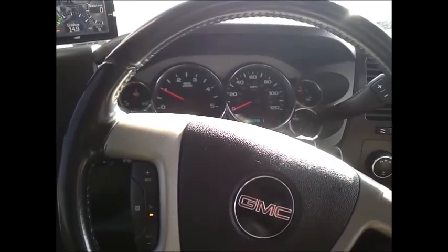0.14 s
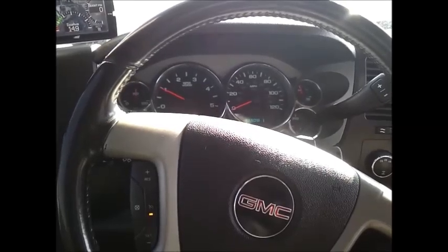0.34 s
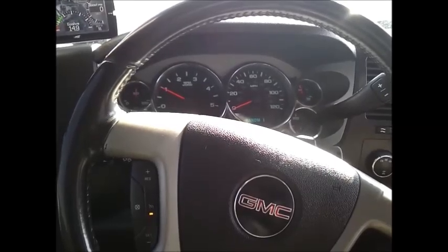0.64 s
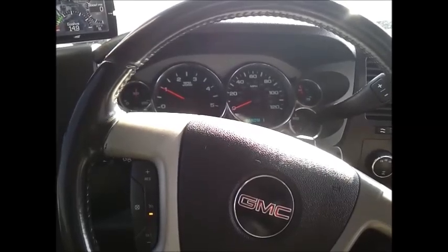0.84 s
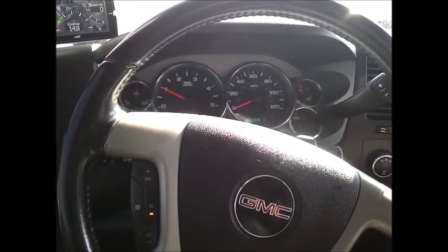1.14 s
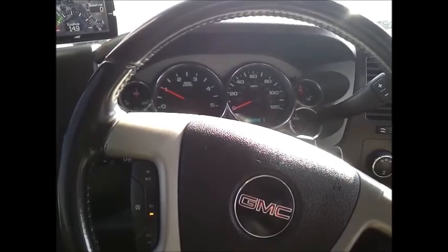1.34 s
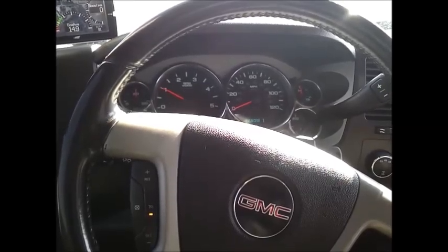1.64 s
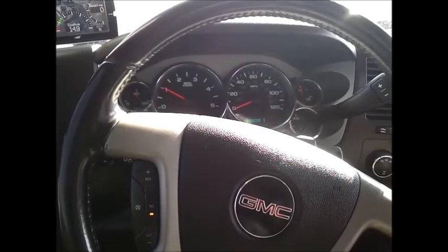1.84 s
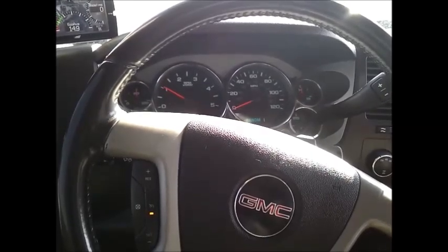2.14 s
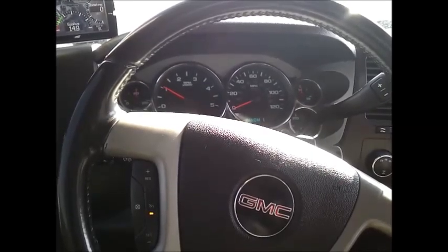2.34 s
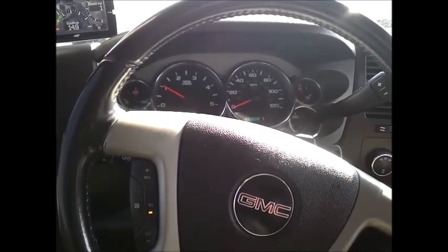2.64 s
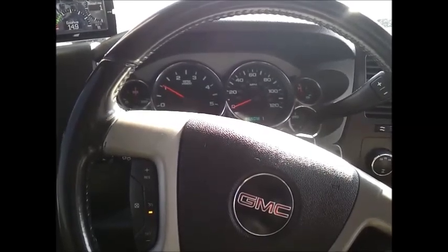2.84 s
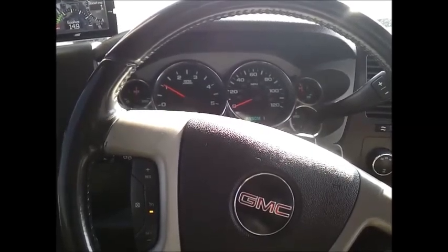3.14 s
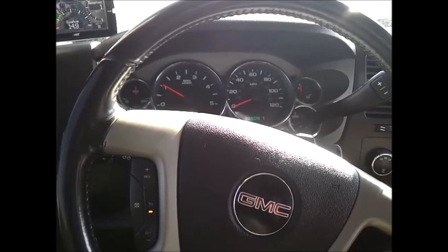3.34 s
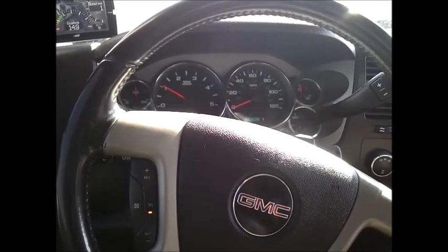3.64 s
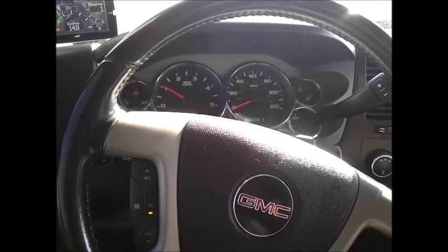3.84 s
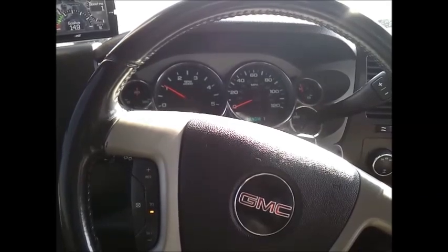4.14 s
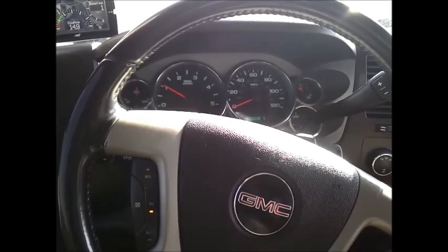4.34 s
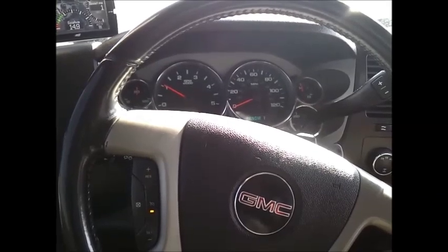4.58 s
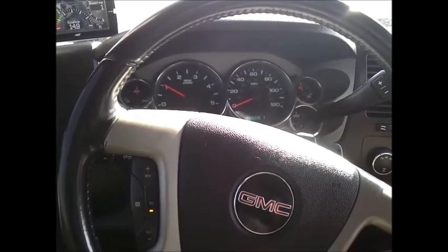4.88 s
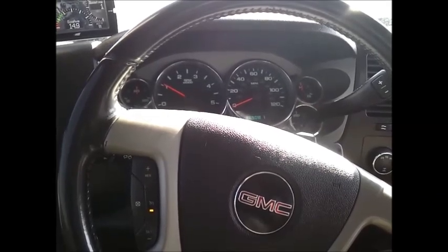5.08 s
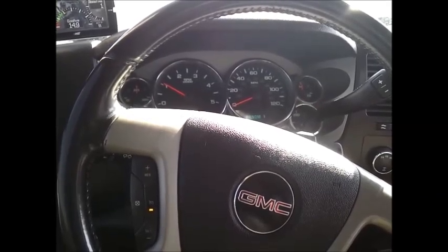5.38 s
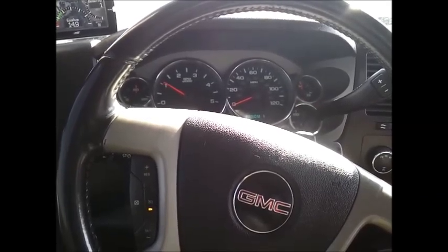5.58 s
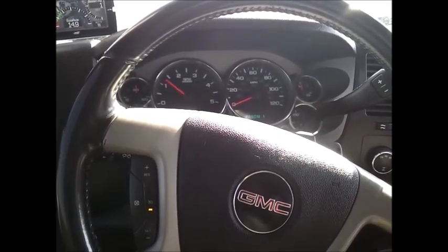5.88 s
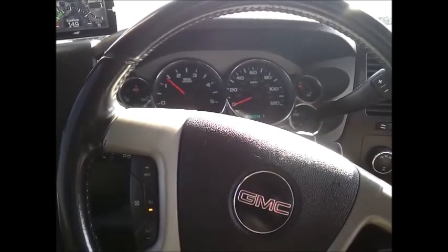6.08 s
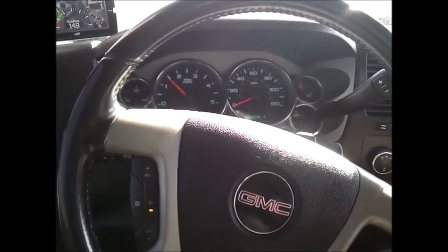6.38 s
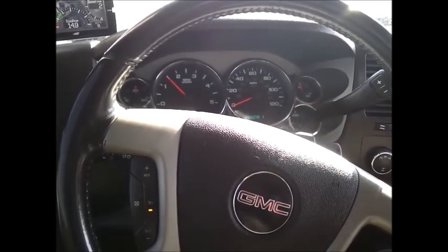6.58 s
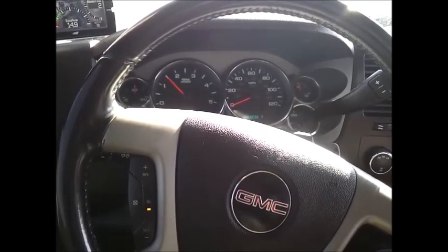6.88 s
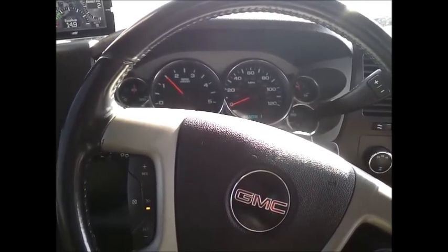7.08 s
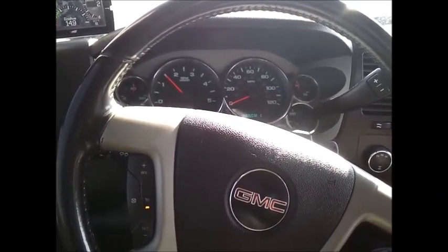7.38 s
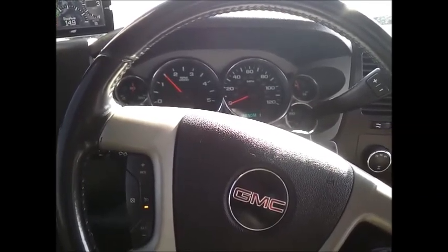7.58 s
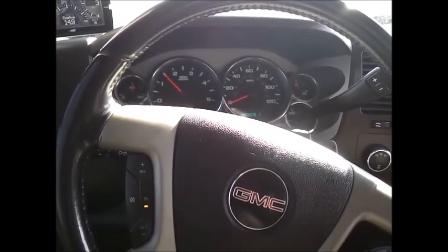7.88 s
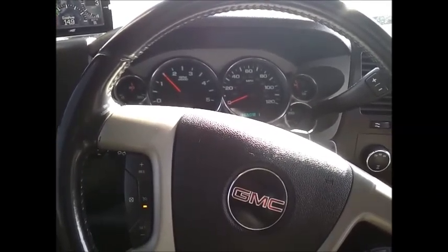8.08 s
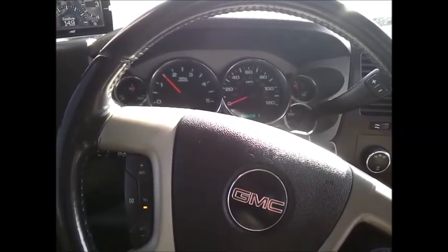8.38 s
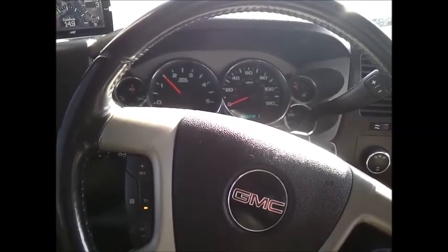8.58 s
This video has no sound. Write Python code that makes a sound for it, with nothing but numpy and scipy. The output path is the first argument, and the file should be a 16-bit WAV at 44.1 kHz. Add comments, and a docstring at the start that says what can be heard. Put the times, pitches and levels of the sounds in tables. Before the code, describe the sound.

A turbo diesel truck stands running, heard inside the cab from the driver's seat in mono with a muffled top end. From 0 s a low, smooth engine boom around 67 hertz sits under rough pulsed rumble, with a thin turbo whistle near 1.7 kilohertz and soft air rush. Around 1.3-1.5 s the revs rise slightly to 72 hertz and the boom recedes; uneven bass surges and a faint resonant drone remain. The whistle glides steadily upward, reaching about 2.2 kilohertz near 4.5 s, joined by wavering higher overtones and a beating second whistle. At 5.2-6.1 s the engine revs up to about 100 hertz, booming and growling more strongly. The whistle pitch then holds nearly level while airy rush, hiss, breathy howl and brief chirps swell, strongest from 7.4 s until the cut at about 8.7 s.

```python
"""Cab of a turbo diesel truck standing at fast idle, heard from the driver's seat; the revs step up twice.
Engine: firing-rate sines boom and rock; pulsed noise rumbles and growls, its bass surging irregularly.
Turbocharger: spools up slowly, whistling at multiples of shaft speed over swelling rush, howl and eddies.
Fixed resonances of ducts and cab colour engine, air, howl, eddies and the lowest whistle notes."""
import sys
import numpy as np
from scipy import signal
from scipy.fft import rfft, irfft, next_fast_len
from scipy.io import wavfile
from scipy.ndimage import uniform_filter1d

SR = 44100
rng = np.random.default_rng(int(sys.argv[2]) if len(sys.argv) > 2 else 0)


def persist_wave(psi):
    """Save psi, clipped to +-1, as 16-bit WAV."""
    counts = np.round(np.clip(psi, -1, 1) * 32767).astype(np.int16)
    wavfile.write(sys.argv[1], SR, np.atleast_2d(counts).T)


N = 384552
HZ = np.maximum(np.fft.rfftfreq(N, 1 / SR), 1)
CUTOFF_HZ = 7600
REF_FLOW_DB = -30

# Engine speed and boom: [t/s, firing rate/Hz, boom level before cab/dB]
ENGINE = [(0, 66.8, -28.5), (1.15, 67.5, -27.5), (1.35, 69, -31), (1.55, 72, -41.5), (5.2, 72.4, -47),
          (5.35, 77.5, -32), (5.55, 88, -37), (5.85, 91.8, -33.5), (6.0, 96, -29.5), (6.14, 100, -28.5),
          (6.8, 100.3, -28.5), (7.2, 98.3, -30), (8.72, 100.1, -28)]
# Combustion noise spectrum at top revs, before bass surges and cab: [f/Hz, level per Hz/dB]
RUMBLE = [(25, -63), (55, -65), (80, -59), (100, -63.5), (125, -49.5), (168, -50), (220, -61.5),
          (330, -66.5), (450, -60.5), (600, -65.5), (750, -78), (1300, -72), (2200, -87.5), (7000, -122.5)]
# Engine orders exciting panels, before bass surges and cab:
# [multiple of firing rate, panel f/Hz, full width at half gain/Hz, mean level at resonance/dB]
PANELS = [(3, 305, 24, -47), (2, 158, 35, -35)]
# Irregular surges of the low rumble: [t/s, bass level change/dB]
BASS_SURGES = [(0.288, -1), (0.981, 7), (1.672, 8.5), (1.705, 9.5), (1.828, 5), (1.879, 7.5), (1.961, 6.5),
               (2.039, 4.5), (2.245, 3), (2.409, 8), (2.498, 4), (2.559, 4), (2.687, 9), (2.795, 9.5),
               (2.972, 4.5), (3.017, 6), (3.064, 3), (3.154, 6.5), (3.195, 7), (3.359, 5), (3.472, 4.5),
               (3.68, 10), (3.889, 4.5), (3.947, 6.5), (4.082, 5), (4.623, 5), (4.714, 5.5), (5.201, 5),
               (5.389, 7), (5.546, 9), (5.772, 5), (5.957, 8), (6.007, 4.5), (6.34, 6.5), (6.679, 0.5),
               (6.829, 6), (7.015, 5.5), (7.17, 5), (7.848, 10.5), (8.453, 2.5)]
# Engine orders ringing out, before bass surges and cab:
# [peak t/s, length/s, multiple of firing rate, level/dB]
PULL = [(4.1, 0.22, 2, -37), (5.5, 0.24, 3, -39), (6.02, 0.38, 6, -39.5)]
# Ducts and cab, resonances and dips: [f/Hz, full width at half the dB/Hz, level/dB]
CAB = [(766, 56, -4), (872, 265, 8), (1121, 47, -8), (1278, 16, 6), (1573, 14, 4.5), (1672, 55, 5),
       (1920, 125, 9), (2150, 35, -11), (2315, 140, 3), (2480, 50, 8), (2441, 54, -9.5), (2846, 120, 6.5),
       (3424, 240, 6), (3990, 34, 4), (4563, 79, 6), (4885, 121, 5), (5080, 190, -5), (5705, 140, 7),
       (5770, 90, -7), (6155, 240, 5.5), (6270, 78, -7), (6810, 102, 3)]
# Turbocharger shaft: [t/s, turns per s/Hz]
SPOOL = [(0, 1668), (0.5, 1708), (1.2, 1778), (1.8, 1849), (3, 2021), (3.9, 2144), (4.5, 2223), (4.8, 2245),
         (5.4, 2259), (6, 2253), (7.2, 2230), (7.8, 2224)]
# Turbocharger air flow, driving rush, hiss, gush, eddies and whistles: [t/s, level/dB]
FLOW = [(0.0, -43.5), (0.05, -43.5), (1.58, -42), (2.13, -40), (3.35, -39.5), (3.69, -38), (5.36, -36),
        (6.58, -31.5), (7.07, -33), (7.75, -29.5), (8.35, -30), (8.72, -26.5)]
# Air rush colour, before level and flow: [f/Hz, relative level per Hz/dB]
RUSH = [(100, -80), (300, -69), (800, -68), (1400, -61), (2000, -59.5), (2600, -62.5), (3500, -64.5),
        (4200, -67), (5600, -66), (6800, -68.5), (7400, -76), (7800, -113)]
# Rough flow at the wheel: [peak t/s, length/s, howl lift/dB, gush lift/dB]
FLOW_SURGES = [(3.293, 0.27, 2.5, 9), (3.55, 0.19, 6, 4.5), (3.822, 0.49, 4.5, 11), (5.8, 0.9, 6, 5.5),
               (6.25, 0.15, 3, 2), (7.447, 1.0, 9.5, 4.5), (8.411, .25, 6, 9)]
# Wheel eddies, before cab:
# [multiple of shaft rate, half-width at -6 dB/Hz, level at reference flow/dB, gain per flow dB/dB]
WHIRL = [(.52, 70, -47, 0.6), (.755, 35.3, -44, 1), (.86, 70, -44, 1), (1.42, 170, -41.5, 1.06),
         (2.52, 111.7, -47, 2.1)]
# Whistle at 1, 2, 3 times shaft rate; the first before cab:
# [mean level at reference flow/dB, gain per flow dB/dB, skirt level relative to tone/dB]
WHISTLE = [(-37, 1.42, -19), (-45.5, 2, -10), (-50, 0.6, -18.5)]
# Swells and dips of single whistle notes: [peak t/s, length/s, multiple of shaft rate, lift/dB]
SWELLS = [(0.2, 0.13, 1, 8), (.7, .4, 1, -5), (2.65, 0.28, 1, 3), (4.25, 0.38, 1, -12), (4.85, .5, 1, 2),
          (5.78, 0.33, 1, 5.5), (7.0, .14, 1, -3), (7.25, 0.26, 1, 2.5), (7.65, 0.5, 1, 7.5),
          (8.22, 0.11, 1, 7), (8.6, 0.41, 1, 3), (3.899, 0.31, 2, 9), (4.93, 0.33, 2, 11), (5.6, .22, 2, 4),
          (6.5, 0.69, 2, 13), (6.05, .22, 2, 6.5), (7.6, 0.33, 2, 4), (7.83, 0.063, 2, -10),
          (8.22, 0.38, 2, 8), (8.58, 0.25, 2, 3.5), (0.5, 0.72, 3, -8.5), (1.4, 0.33, 3, 1.5),
          (1.71, 0.13, 3, 12), (1.87, 0.21, 3, 10), (2.5, .45, 3, 3.5), (7.56, 0.35, 3, 10.5),
          (7.84, 0.4, 3, 16), (8.4, .35, 3, 8.5)]
# Second, fainter whistle beside the shaft rate: [t/s, f/Hz]
SIDE_WHISTLE = [(0, 1617), (.6, 1668), (1.5, 1763), (2.15, 1842), (3.1, 1973), (3.7, 2065), (4.55, 2178),
                (5.15, 2243), (6.6, 2219), (7.1, 2263), (8.72, 2261)]
# Side tones of the shaft: [peak t/s, length/s, multiple of shaft rate, mean level/dB]
FLARES = [(0.24, .25, 3.385, -57), (1.2, .25, 3.41, -59), (2.55, .35, 3.53, -61), (3.23, .16, 3.435, -57),
          (3.2, .35, .76, -48), (5.15, .8, .527, -52.5)]
# Howl breaking into chirps: [peak t/s, mean f/Hz, level/dB]
CHIRPS = [(3.523, 1658, -35), (4.41, 1670, -33.5), (5.346, 1680, -30), (6.804, 1696, -30),
          (7.276, 1680, -27.5), (8.425, 1676, -33)]


def from_db(db):
    """Decibels to amplitude gain."""
    return 10 ** (np.asarray(db) / 20)


def in_time(rows):
    """Table columns interpolated to every sample."""
    t_s, *columns = np.transpose(rows)
    return [np.interp(np.arange(N) / SR, t_s, column) for column in columns]


def colour(points):
    """Gain over HZ, interpolated in dB over log frequency."""
    hz, db = np.transpose(points)
    return from_db(np.interp(np.log(HZ), np.log(hz), db))


def noise(gain):
    """Gaussian noise with the given rms gain per Hz."""
    return irfft(rfft(rng.standard_normal(N)) * gain * np.sqrt(SR / 2), N)


def drift(corner_hz, step=8):
    """Low-passed noise of spread 1, -6 dB at the corner, drawn every eighth sample."""
    size = next_fast_len(N // step + 2)
    hz = np.fft.rfftfreq(size, step / SR)
    spectrum = rfft(rng.standard_normal(size)) / (1 + (hz / corner_hz) ** 2)
    slow = irfft(spectrum, size)
    return np.interp(np.arange(N) / step, np.arange(size), slow / slow.std())


def angle(hz):
    """Phase in radians of a rotation at the given rate, from a random start."""
    return 2 * np.pi * (np.cumsum(hz) / SR + rng.random())


def tone(phase, rms_db):
    """Sine of the given rms level."""
    return np.sqrt(2) * from_db(rms_db) * np.sin(phase)


def breathy(phase, half_width_hz):
    """Noise band of rms 1 around a moving pitch: two random quadrature carriers."""
    return drift(half_width_hz) * np.cos(phase) + drift(half_width_hz) * np.sin(phase)


def swell(peak_s, length_s):
    """Gaussian rise and fall of height 1; length is the full width at half height."""
    out = np.zeros(N)
    start = max(0, int((peak_s - 2 * length_s) * SR))
    stop = min(N, int((peak_s + 2 * length_s) * SR))
    near = np.arange(start, stop)
    out[near] = np.exp2(-(2 * (near / SR - peak_s) / length_s) ** 2)
    return out


def resonance(hz, centre_hz, width_hz):
    """Peak of height 1; width is the full width at half height."""
    return 1 / (1 + (2 * (hz - centre_hz) / width_hz) ** 2)


def cab(x):
    """Ducts and cab lift some pitches and swallow others."""
    db = sum(height_db * resonance(HZ, hz, width_hz) for hz, width_hz, height_db in CAB)
    return irfft(rfft(x) * from_db(db), N)


def engine(firing_hz, boom_db, knock=0.091, half_order_db=-25, rock_db=-42, rock_slowing_db=-20,
           rumble_slowing_db=3.0):
    """Four firings per crank turn: low orders boom and rock, each firing slightly swells the noise."""
    revs = firing_hz / firing_hz.max()
    firing = angle(firing_hz)
    crank = firing / 4
    boom = tone(firing, boom_db)
    rock = tone(crank, rock_db + rock_slowing_db * (1 - revs))
    half_order = tone(crank * 3 / 2, boom_db + half_order_db)
    pulsed = (noise(colour(RUMBLE)) + growl(revs)) * (1 + knock * np.cos(firing))
    rumble = pulsed * from_db(rumble_slowing_db * (1 - revs))
    return boom + rock + half_order + surging_bass(panel_tones(firing_hz, firing) + pull(firing) + rumble)


def growl(revs, full_db=-42.5, full_hz=173, half_width_hz=55, steepness=3.6, peak_s=6.6, length_s=2.6,
          lift_db=9.0, upper_hz=330, upper_db=-10):
    """Two noise bands follow the revs in pitch, rise steeply with them and swell after the second step."""
    lower = breathy(angle(full_hz * revs), half_width_hz)
    upper = from_db(upper_db) * breathy(angle(upper_hz * revs), half_width_hz)
    return from_db(full_db + lift_db * swell(peak_s, length_s)) * revs ** steepness * (lower + upper)


def panel_tones(firing_hz, firing, waver_db=0.82):
    """An engine order is loud only while near the resonance of its panel."""
    return sum(tone(round(k) * firing, db + waver_db * drift(8.5)) * resonance(k * firing_hz, hz, width_hz)
               for k, hz, width_hz, db in PANELS)


def drone(idling, panel_hz=450, half_width_hz=12, idle_db=-48, peak_s=3.2, length_s=1.1, lift_db=8):
    """Narrow resonance shaken by the idling engine: swells once, weakens at higher revs."""
    level = from_db(idle_db + lift_db * swell(peak_s, length_s))
    return idling * level * breathy(angle(np.full(N, panel_hz)), half_width_hz)


def hum(idling, start_hz=235, creep_hz_per_s=12, top_hz=274, idle_db=-49, peak_s=1.85, length_s=1.2,
        lift_db=9.5):
    """Faint sine creeps up to a fixed top, swells once, weakens at higher revs."""
    hz = np.minimum(start_hz + creep_hz_per_s * np.arange(N) / SR, top_hz)
    return idling * tone(angle(hz), idle_db + lift_db * swell(peak_s, length_s))


def air(flow_db, rush_db=-3.5, rush_follows=1.0, hiss_db=-2.0, hiss_follows=1.026, split_hz=4000,
        flutter_db=0.5):
    """Air rushes through the ducts with hiss on top; both grow with flow."""
    high = 1 / (1 + (split_hz / HZ) ** 8)  # power share of the hiss
    rush = noise(colour(RUSH) * np.sqrt(1 - high)) * from_db(rush_db + rush_follows * flow_db)
    hiss = noise(colour(RUSH) * np.sqrt(high)) * from_db(hiss_db + hiss_follows * flow_db)
    return (rush + hiss) * from_db(flutter_db * drift(10))


def howl(shaft, shaft_hz, flow_db, swirl_ratio=.745, half_width_hz=70, howl_db=-43, howl_power=8.0,
         gush_db=-41, gush_follows=0.95, gush_half_width_hz=260, churn_db=1.5):
    """Swirl lags the wheel and howls, steeply with its speed; turbulence gushes around the shaft rate."""
    howl_lift_db = sum(db * swell(s, length_s) for s, length_s, db, _ in FLOW_SURGES)
    gush_lift_db = sum(db * swell(s, length_s) for s, length_s, _, db in FLOW_SURGES)
    swirl_level = from_db(howl_db + howl_lift_db) * (shaft_hz / shaft_hz.max()) ** howl_power
    swirl = swirl_level * breathy(swirl_ratio * shaft, half_width_hz)
    gush_level = from_db(gush_db + gush_follows * flow_db + gush_lift_db)
    gush = gush_level * breathy(shaft, gush_half_width_hz)
    return (swirl + gush) * from_db(churn_db * drift(30))


def whirl(shaft, flow_db):
    """Eddies lock to fixed ratios of shaft speed: breathy strands moving with it."""
    return sum(from_db(db + follows * flow_db) * breathy(k * shaft, half_width_hz)
               for k, half_width_hz, db, follows in WHIRL)


def whistle(shaft, flow_db, waver_db=2.0, breath_half_width_hz=28):
    """Shaft multiples with thin turbulent skirts; the lowest moves through the duct resonances."""
    notes = []
    for k, (ref_db, follows, breath_db) in enumerate(WHISTLE, 1):
        lift_db = sum(lift * swell(s, length_s) for s, length_s, multiple, lift in SWELLS
                      if round(multiple) == k)
        db = ref_db + follows * flow_db + lift_db
        clean = tone(k * shaft, db + waver_db * drift(29))
        skirt = from_db(db + breath_db) * breathy(k * shaft, breath_half_width_hz)
        notes.append(clean + skirt)
    return cab(notes[0]) + sum(notes[1:])


def side_whistle(flow_db, low_db=-52, fade_db_per_s=2.0, peak_s=.33, length_s=0.41, lift_db=7,
                 top_db=-51, follows=.55, waver_db=3.0, top_s=2.4, attack_s=0.14, flare_db=8.5):
    """Second whistle beats with the first: low note swells and fades, its third multiple enters flaring."""
    hz, = in_time(SIDE_WHISTLE)
    t_s, phase = np.arange(N) / SR, angle(hz)
    low = tone(phase, low_db - fade_db_per_s * t_s + lift_db * swell(peak_s, length_s))
    attack = np.clip((t_s - top_s) / attack_s, 0, 1)
    db = top_db + follows * flow_db + flare_db * swell(top_s + attack_s, attack_s)
    top = attack * tone(3 * phase, db)
    return (cab(low) + top) * from_db(waver_db * drift(9.7))


def side_tones(shaft, waver_db=4.0):
    """Faint tones at fixed ratios of shaft speed flare up briefly."""
    flares = sum(swell(s, length_s) * tone(k * shaft, db) for s, length_s, k, db in FLARES)
    return flares * from_db(waver_db * drift(12))


def surging_bass(x, low_hz=105, high_hz=230, between_db=-1.5, surge_s=0.024, evenness=.62, average_s=0.04):
    """Low rumble is partly levelled, then changes level briefly at irregular moments."""
    bass = irfft(rfft(x) / (1 + (low_hz / HZ) ** 10) / (1 + (HZ / high_hz) ** 10), N)
    fast_power, slow_power = (uniform_filter1d(bass ** 2, int(s * SR) + 1) + 1e-12
                              for s in (average_s, 20 * average_s))
    levelling = (slow_power / fast_power) ** (evenness / 2)
    change_db = between_db + sum(db * swell(s, surge_s) for s, db in BASS_SURGES)
    return x - bass + bass * levelling * from_db(change_db)


def chirps(length_s=0.044, wander_hz=14):
    """Howl breaks into brief chirps, each with its own pitch and strength."""
    hz, _ = in_time(CHIRPS)
    strength = sum(from_db(db) * swell(s, length_s) for s, _, db in CHIRPS)
    return strength * tone(angle(hz + wander_hz * drift(35)), 0)


def pull(firing):
    """Upper engine orders ring out briefly, locked to the firing rate."""
    return sum(swell(s, length_s) * tone(round(k) * firing, db) for s, length_s, k, db in PULL)


def scene(wobble_hz=0.55, idle_hz=72, idle_width_hz=30):
    """Engine speed, shaft speed and air flow drive the main layers; both channels are identical."""
    firing_hz, boom_db = in_time(ENGINE)
    shaft_hz, = in_time(SPOOL)
    flow_db = in_time(FLOW)[0] - REF_FLOW_DB
    idling = resonance(firing_hz, idle_hz, idle_width_hz)  # near 1 at fast idle, about 0.2 at top revs
    shaft = angle(shaft_hz + wobble_hz * drift(9.2))
    motor = engine(firing_hz, boom_db) + drone(idling)
    flow_noise = air(flow_db) + howl(shaft, shaft_hz, flow_db) + whirl(shaft, flow_db)
    whistles = whistle(shaft, flow_db) + side_whistle(flow_db) + side_tones(shaft)
    mono = cab(motor + flow_noise) + hum(idling) + whistles + chirps()
    return np.array([mono, mono])


def record(dry):
    """Steep elliptic low-pass: 0.2 dB ripple, 80 dB stop band."""
    return signal.sosfilt(signal.ellip(10, .2, 80, CUTOFF_HZ, fs=SR, output="sos"), dry)


dry = scene()
out = record(dry)
persist_wave(out)
```